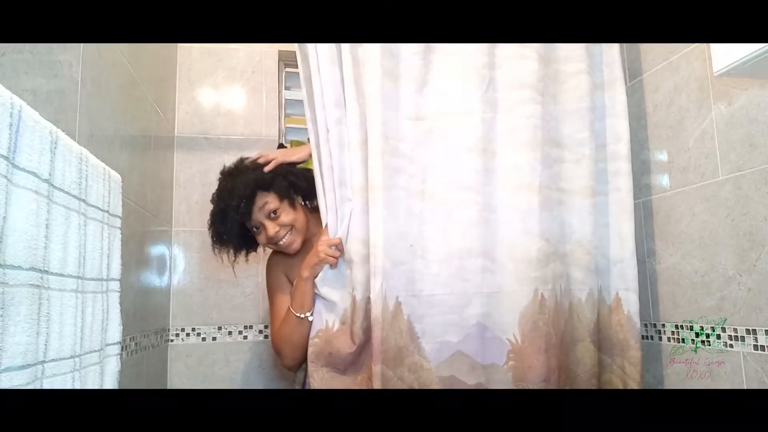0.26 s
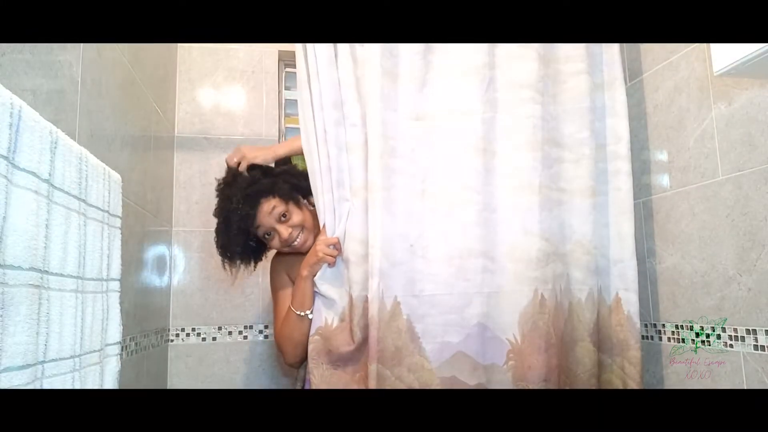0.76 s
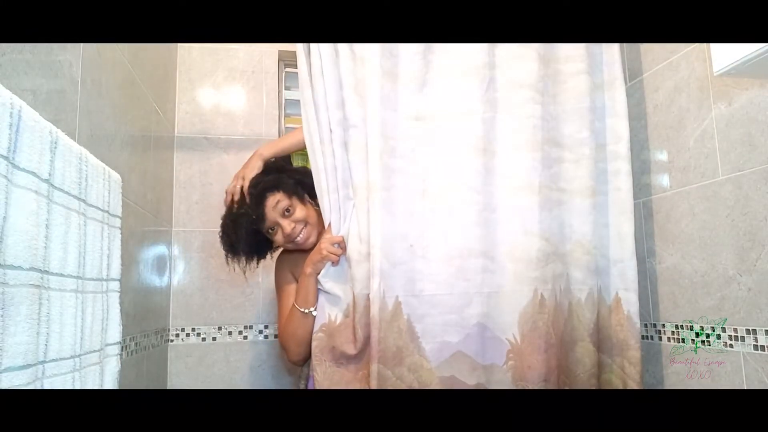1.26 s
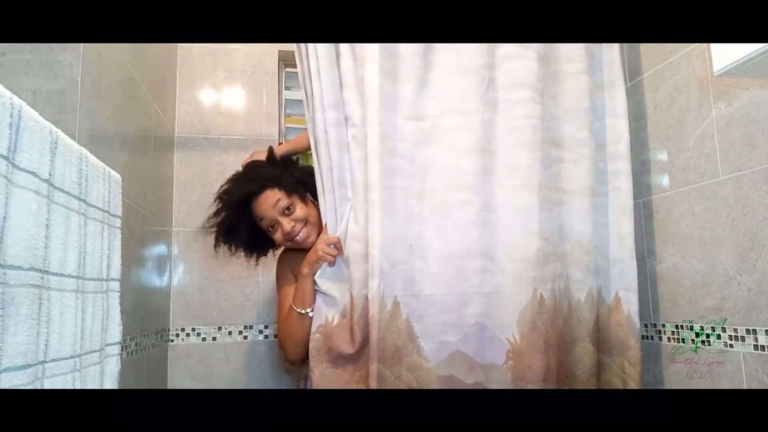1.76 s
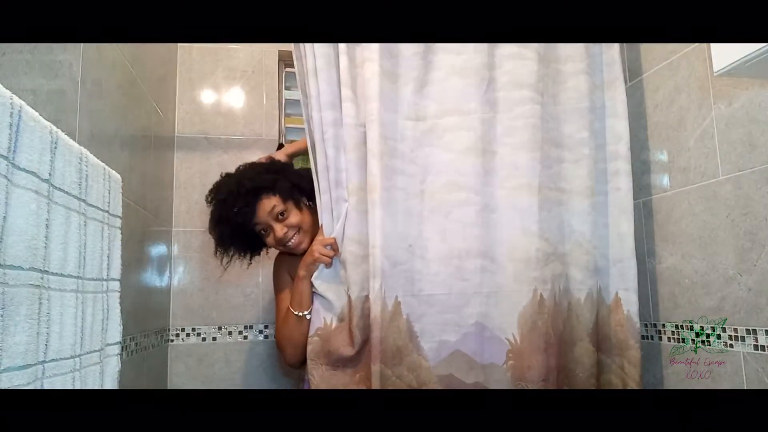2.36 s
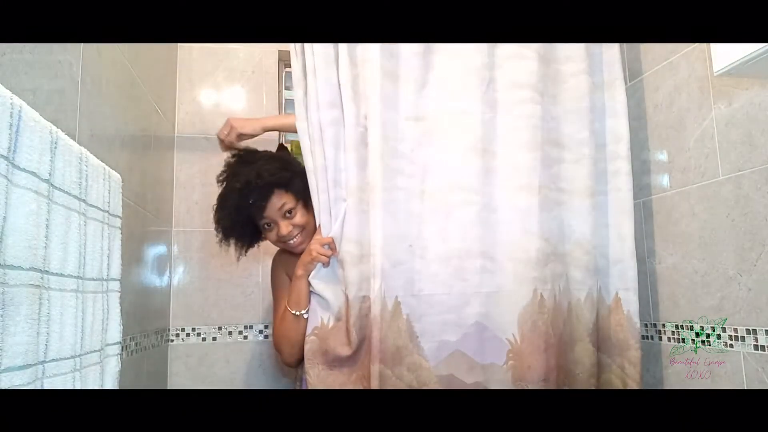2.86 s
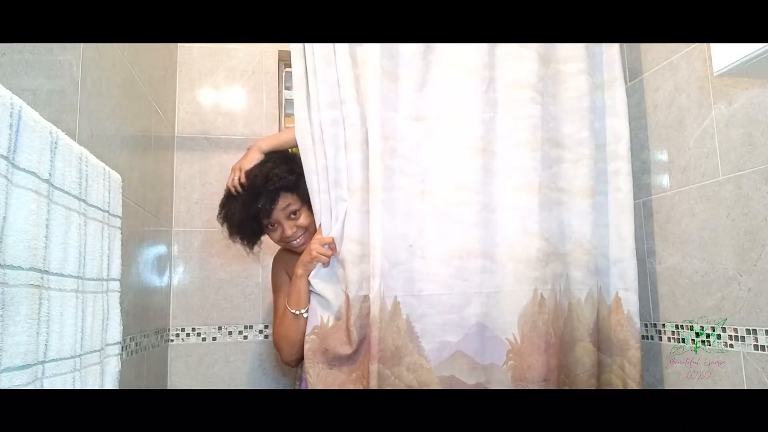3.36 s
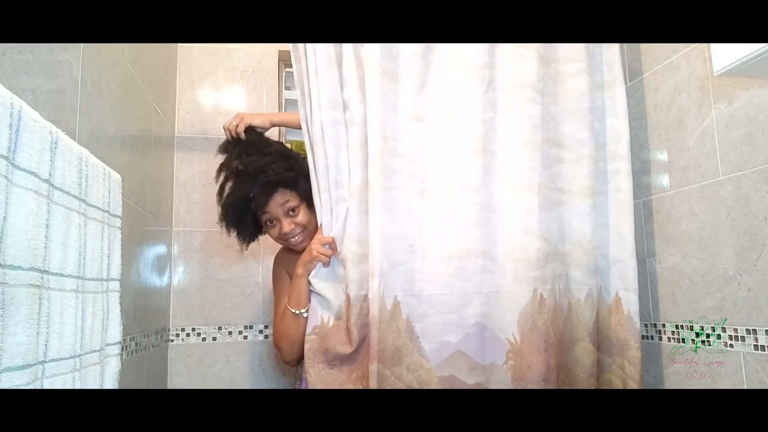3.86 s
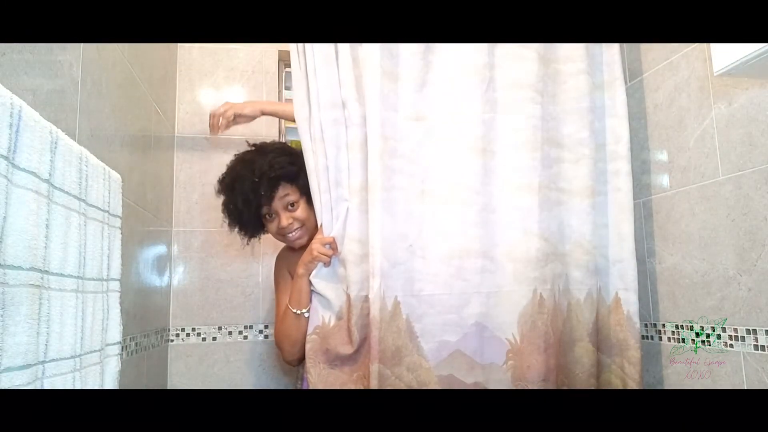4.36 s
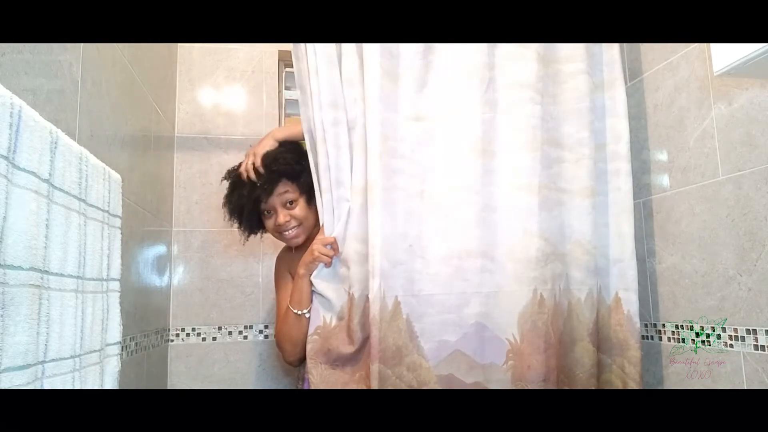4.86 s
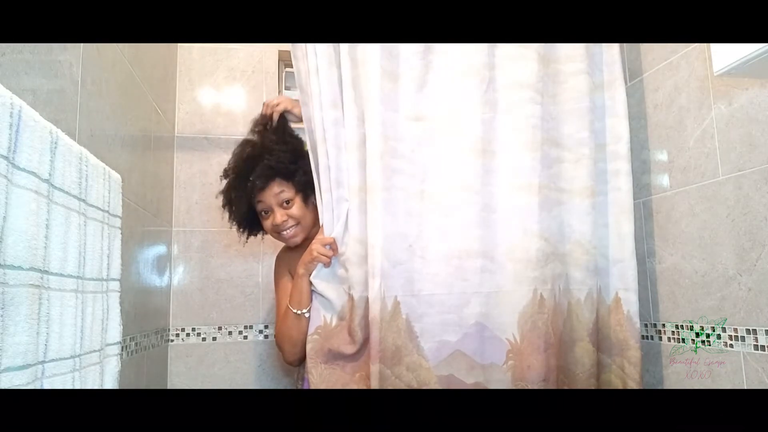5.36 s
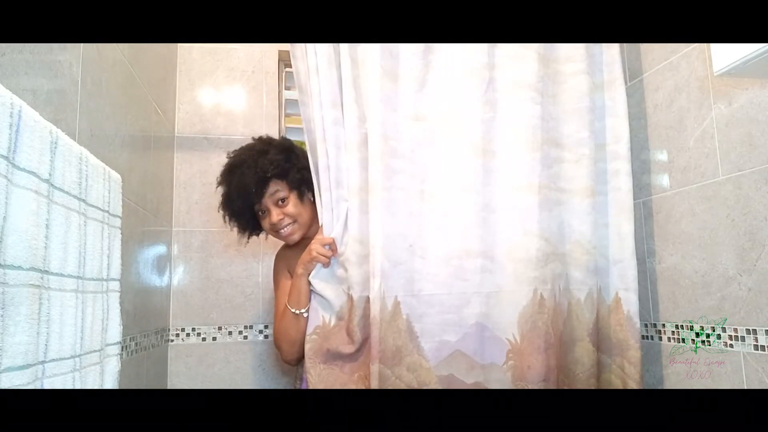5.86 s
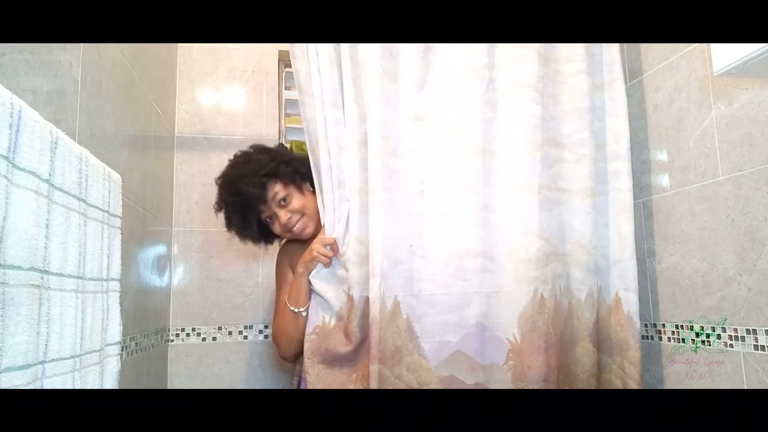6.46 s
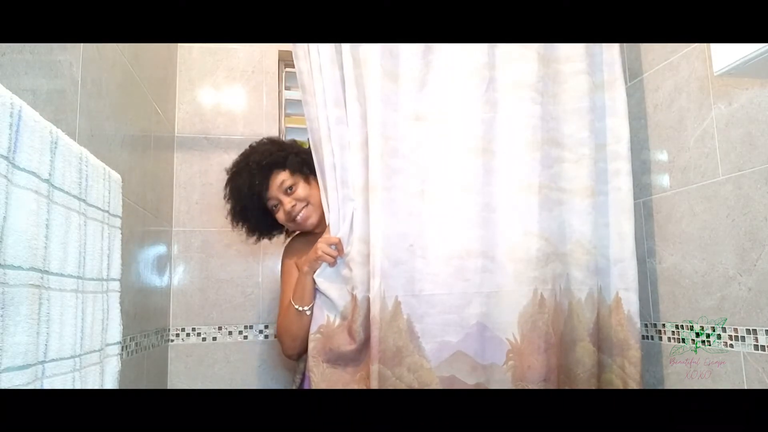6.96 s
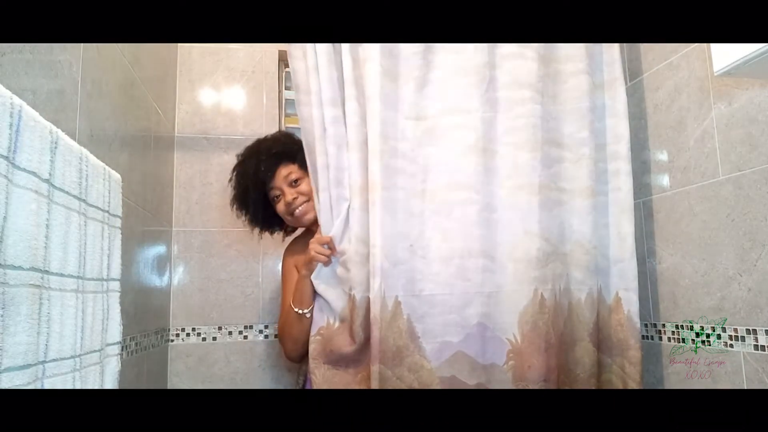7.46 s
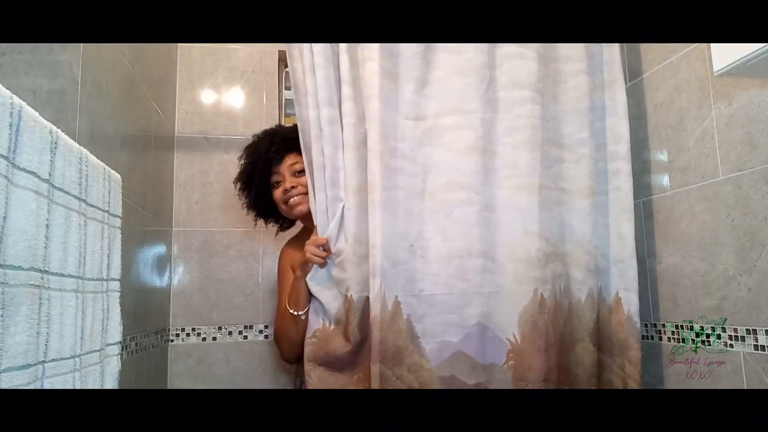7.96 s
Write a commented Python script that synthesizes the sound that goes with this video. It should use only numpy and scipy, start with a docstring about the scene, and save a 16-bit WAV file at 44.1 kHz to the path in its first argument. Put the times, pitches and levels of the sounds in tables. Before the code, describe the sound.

Steady shower water falls behind a cloth curtain into a tub, a fizzy patter with uneven spatters as the falling water shifts. Heavier slaps of water stand out midway and cluster toward the end, around a muffled knock on the tub. Faint low hum and hollow drumming lie underneath. The tiled room gives a short, tight reflection; the stereo pickup is fairly near and bright. No talking.

```python
"""Tiled bathroom: a shower sprays into a tub behind a curtain, heard by a two-port microphone.
Spray and splashes are one patter of noise and bubbles, its power shaped by frequency and time.
A few large bubbles plop. The tub drums as noise through its modes; soft blows ring the modes and slosh.
A low hum of a wandering sine and narrow rumble lies beneath."""
import sys
import numpy as np
from scipy import signal
from scipy.fft import rfft, irfft, next_fast_len
from scipy.io import wavfile
from scipy.ndimage import uniform_filter1d, map_coordinates

SR = 44100
rng = np.random.default_rng(int(sys.argv[2]) if len(sys.argv) > 2 else 0)


def inscribe(sig):
    """Save sig as 16-bit PCM at rate SR to the path in sys.argv[1].

    A 1-D sig is mono; a 2-D sig holds one channel per row.
    Samples are clipped to [-1, 1] before scaling.
    """
    pcm = np.round(np.clip(np.atleast_2d(sig).T, -1, 1) * 32767)
    wavfile.write(sys.argv[1], SR, pcm.astype(np.int16))


N = 362766

# Splashes that stand out; nominal peak over the spray: start_s, peak_db, bubble_radius_mm, spread_octaves, rise_ms
SPLASHES = [(0.054, 12.5, 0.85, 0.84, 10), (0.185, 11, 0.87, 0.85, 36), (0.282, 3, 0.35, 0.67, 12),
            (0.474, 9.5, 0.53, 0.42, 3.6), (0.585, 4.5, 0.74, 0.71, 26), (0.66, 6.5, 0.71, 0.97, 46),
            (0.774, 8.5, 0.62, 0.71, 9.4), (0.862, 7, 0.51, 1.2, 33), (0.965, 7.5, 0.48, 0.42, 5.3),
            (1.038, 6, 0.17, 1.5, 41), (1.1, 7.5, 0.59, 1, 47), (1.224, -4, 0.24, 1.56, 40),
            (1.296, 6.5, 0.7, 1.1, 16), (1.36, 4, 0.66, 1.4, 14), (1.412, 5, 1.2, 1, 31),
            (1.52, 3, 0.8, 1.5, 5.4), (1.584, 8, 0.25, 0.33, 4.8), (1.62, 10.5, 0.97, 0.35, 14),
            (1.706, 8.5, 0.57, 1.3, 10), (1.76, 9.5, 0.93, 1.14, 6.7), (1.846, 16.5, 0.87, 0.57, 13),
            (1.892, 5, 0.61, 0.95, 65), (1.923, 14, 0.78, 0.38, 4.6), (2.046, 6.5, 0.64, 0.95, 29),
            (2.14, -0.5, 0.65, 1.97, 13), (2.249, 8.5, 0.85, 0.76, 8.5), (2.364, 13, 0.92, 0.55, 7.7),
            (2.612, 12, 0.75, 0.72, 16), (2.759, 6, 0.59, 0.73, 21), (2.819, 2.5, 0.44, 0.83, 28),
            (2.886, 6.5, 0.61, 1.1, 18), (2.951, 9, 0.62, 0.78, 15.6), (2.976, 18.5, 1.31, 0.6, 9.4),
            (3.027, 9.5, 0.58, 0.78, 10), (3.279, 7.5, 0.39, 0.46, 7), (3.325, 9, 0.6, 0.81, 11),
            (3.48, 5, 0.61, 0.84, 13), (3.591, 7, 0.89, 0.7, 44), (3.666, 4, 0.52, 0.67, 14),
            (3.772, 1.5, 0.32, 0.97, 22), (3.89, 9.5, 1.04, 0.81, 9), (3.997, 10.5, 0.78, 0.72, 39),
            (4.231, 14, 0.8, 0.6, 18), (4.309, 24, 1.26, 0.35, 9), (4.312, 11.5, 0.54, 0.13, 6.7),
            (4.465, 17.5, 0.9, 0.48, 7.9), (4.515, 4, 0.21, 1.7, 21), (4.648, 5, 0.21, 0.38, 9.9),
            (4.715, 3.5, 0.32, 0.59, 15), (4.828, 5.5, 0.56, 0.67, 5.6), (4.939, 6.5, 0.54, 1.3, 5.2),
            (4.983, 7, 1.22, 0.41, 47), (5.073, 8.5, 0.64, 0.49, 8.7), (5.142, 4, 0.53, 1, 46),
            (5.212, 16.5, 0.94, 0.27, 6.8), (5.275, 5.5, 1.04, 0.86, 49), (5.332, 7.5, 0.45, 0.28, 28),
            (5.459, 4.5, 0.23, 1.1, 11), (5.481, 12, 0.85, 0.61, 17), (5.626, 8.5, 0.36, 0.95, 15),
            (5.759, 9.5, 1.06, 0.72, 12), (5.807, 6, 0.96, 1.1, 48), (5.894, 4.5, 0.48, 0.7, 32),
            (5.952, 3.5, 0.52, 1.26, 24), (6.058, 10.5, 0.93, 0.53, 14), (6.095, 4, 0.4, 0.79, 14),
            (6.172, 4.5, 0.81, 0.82, 34), (6.252, 16.5, 1.03, 0.32, 10), (6.3, 12, 0.82, 0.62, 5.1),
            (6.347, -1, 0.5, 1.5, 27), (6.45, 4.5, 0.59, 0.44, 7.2), (6.522, 2.5, 0.45, 1.17, 5.9),
            (6.563, 3.5, 0.64, 1, 15), (6.617, 4, 0.34, 1.7, 31), (6.713, 15, 0.92, 0.4, 10),
            (6.8, 3, 0.3, 0.33, 10), (6.853, 15, 0.78, 0.47, 13), (6.915, 19.5, 1.08, 0.41, 10),
            (7.023, 9, 0.8, 0.88, 25), (7.066, 9, 1.4, 0.41, 58), (7.125, 5.5, 0.3, 0.58, 18),
            (7.175, 10, 0.42, 0.29, 10), (7.279, 8, 0.16, 0.5, 18), (7.309, 18.5, 1.13, 0.4, 11),
            (7.35, 4, 0.37, 0.71, 25), (7.452, 2.5, 0.32, 0.74, 7.1), (7.524, 5, 0.38, 0.79, 27),
            (7.61, 3, 0.26, 0.36, 15), (7.677, 7.5, 0.64, 0.66, 16), (7.773, 16, 0.88, 0.73, 3),
            (7.805, 1, 0.51, 0.98, 18), (7.981, 17, 0.85, 0.62, 4), (8.02, 17.5, 0.89, 0.66, 15),
            (8.183, 4, 0.67, 0.73, 13)]
# Spray strength before room and clumps: time_s, level_db
SPRAY_FLOW = [(0.0, -36.5), (1.28, -35.5), (2.7, -36.5), (3.27, -36.5), (3.48, -34.5), (4.95, -37),
              (5.27, -33), (5.52, -38), (5.75, -35.5), (7.1, -35), (8.23, -37.5)]
# Spray colour at the microphone, relative: freq_hz, density_db_per_hz
SPRAY_COLOUR = [(530, -31), (900, -22.5), (1130, -23.5), (1500, -19.5), (1940, -18), (3070, -13.5),
                (3500, -10), (4800, -6), (6900, 1.5), (7300, -4.5), (8200, -7), (11500, 0), (13500, 0),
                (14600, -1), (15900, -7.5)]
# Coarse drops of the spray, used relative to their mean: time_s, level_db
COARSE_DROPS = [(0.0, -52.5), (0.11, -62), (0.32, -61.5), (0.57, -63), (0.82, -57), (1.56, -59),
                (1.76, -58.5), (2.47, -60), (3.64, -59.5), (4.12, -62), (4.47, -55), (4.63, -58),
                (4.97, -58), (5.18, -59), (5.5, -58.5), (6.14, -58.5), (6.69, -58.5), (6.99, -54),
                (7.42, -60), (8.23, -55.5)]
# RMS depth of the clumps in the patter: freq_hz, depth_db
CLUMP_DEPTH = [(1000, 2.5), (3000, 2.5), (7000, 1.3), (14000, 1.64)]
# Single large bubbles, before the room: start_s, peak_db, pitch_hz, life_ms
PLOPS = [(1.66, -55, 1390, 7.9), (1.695, -54, 1450, 6.6), (5.013, -48, 2430, 4.7), (5.714, -63, 1540, 7),
         (7.074, -46, 2060, 9.2), (7.148, -60, 1604, 12)]
# Dull wash in the tub, relative: freq_hz, density_db_per_hz
TUB_WASH = [(15, -42), (25, -22), (60, -3.5), (110, -4.5), (197, -10.5), (270, -6), (422, -11), (608, -6.5),
            (1070, -25.5), (1500, -6), (2860, -120)]
# Tub modes, relative: freq_hz, level_db, t60_s
TUB_MODES = [(143, -1, 0.15), (277, 3.5, 0.24), (341, 5, 0.11), (399, -4.5, 0.26), (486, 2, 0.49),
             (644, 0.5, 0.53), (730, -4.5, 0.49), (843, 4.5, 0.24), (990, -5, 0.2), (1280, -7, 0.15)]
# Drumming of the tub before its sway: time_s, level_db
TUB_LEVEL = [(0.0, -68), (1.88, -65.5), (5.61, -66.5), (6.99, -64), (7.4, -67.5), (7.63, -63),
             (8.23, -65.5)]
# Blows on the tub, nominal level before the room: start_s, peak_db, centre_hz, rise_ms, slosh_db (re blow)
THUMPS = [(.66, -62, 700, 16, 0), (1.261, -55.5, 366, 17, -4), (1.799, -55, 325, 44, -2),
          (3.721, -58.5, 355, 17, -4), (4.01, -60, 570, 20, -5), (4.681, -58, 648, 9.8, -3.5),
          (5.756, -55.5, 649, 13, -3), (6.629, -50, 760, 10.4, -8), (6.648, -54, 600, 12, -8),
          (6.758, -39, 562, 18.4, -15), (6.805, -54, 780, 8.9, -9), (6.834, -58, 560, 8.6, -8),
          (6.956, -58, 400, 18, -8), (7.02, -58, 380, 16, -11), (7.099, -58, 530, 17, -5),
          (7.181, -55, 330, 18, -5)]
# Hum, base level before flutter: time_s, level_db, pitch_hz
HUM = [(0.0, -68, 84.6), (0.23, -79, 79), (0.75, -64, 82.8), (1.19, -74, 88.1), (1.33, -72, 73.8),
       (1.56, -68, 91.4), (1.63, -65, 83), (2.45, -77, 73.2), (2.56, -73, 78.1), (3.12, -74, 87.5),
       (3.41, -71, 80.4), (3.57, -73, 88.3), (4.28, -73.5, 83.0), (4.44, -78, 92.6), (4.58, -68, 76.9),
       (5.91, -68, 79), (6.02, -67, 84.5), (6.19, -70, 73), (6.3, -69, 88.4), (6.57, -69, 77.1),
       (6.71, -73, 90.0), (7.26, -76, 80), (7.49, -70, 82.8), (7.7, -75.5, 71.6), (8.02, -70, 84.9),
       (8.23, -76, 73.9)]
# Left-right likeness: freq_hz, correlation
PORT_LIKENESS = [(60, 0.17), (150, 0.59), (380, 0.83), (950, -0.14), (2380, -0.017), (5980, -0.0021),
                 (15000, 0.086)]
# Level offset between ports: freq_hz, left_minus_right_db
PORT_LEAN = [(60, 1.5), (180, 2), (550, -5.5), (1650, -1), (4970, 0.0), (15000, -1)]

TOP_HZ = 15890
FRAME = 256  # samples
COARSE_HZ = 3000  # coarse drops ring mostly below
PELT_DB = 1.6  # RMS unevenness of a splash's drops
SPLASH_FADE_MS = 26.2  # power of the main part falls by 63%
BRIGHT_DB, BRIGHT_FADE_MS, BRIGHT_EDGE_HZ = -12.5, 22, 3720  # weaker, brighter part of a splash
DRIBBLES_PER_S, DRIBBLE_DB, DRIBBLE_RISE_MS = 4, -9, 41  # level over the spray
DRIBBLE_RADIUS_MM, DRIBBLE_SCATTER_OCTAVES = 0.27, 1.46  # middle, scatter to either side
DRIBBLE_SPREAD_OCTAVES = 0.13
TUB_SWAY_DB = 0.7
RING_DB = -20  # mode ring re blow
SLOSH_T60_S, SLOSH_WIDTH_OCTAVES = 0.49, 0.37


def shower():
    """Drops strike as one patter; splashes add power to the spray by frequency and time."""
    frames = dict(fs=SR, nperseg=FRAME, noverlap=FRAME * 3 // 4)
    patter = droplets(count=10000, cycles=3.5, scatter_db=3.5, bubble_db=-12.5)
    hz, t, spectrum = signal.stft(patter, **frames)

    coarse_db = np.interp(t, *np.transpose(COARSE_DROPS))
    coarse_share = 1 / (1 + (hz / COARSE_HZ) ** 2)
    spray_power = amp(2 * np.outer(coarse_share, coarse_db - coarse_db.mean()))

    pelt = amp(2 * PELT_DB * unit(uniform_filter1d(rng.standard_normal(len(t)), size=3)))
    pelt = pelt / pelt.mean()

    # clumps: patches of random gain
    field = rng.standard_normal(spray_power.shape)
    field = uniform_filter1d(field, size=6, axis=0)
    field = uniform_filter1d(field, size=16, axis=1)
    clumps = amp(2 * along(CLUMP_DEPTH, hz)[:, None] * unit(field))

    power = (spray_power + pelt * splash_power(hz, t)) * clumps
    water = signal.istft(spectrum * np.sqrt(power), **frames)[1][:, :N]
    room = tiles(stereo(water), t60_s=0.06, wet_db=-5, dull_hz=5000)

    def colour(f):
        gain = amp(along(SPRAY_COLOUR, f))
        return gain / np.sqrt(np.mean(gain ** 2))

    return amp(curves(SPRAY_FLOW)[0]) * filtered(room, colour)


def splash_power(hz, t):
    """Power rises smoothly and fades around the bubbles' pitch; a weaker, brighter part fades a little sooner."""
    rows = np.vstack([SPLASHES, dribbles()])
    start_s, peak_db, radius_mm, spread_octaves, rise_ms = np.transpose(rows)[:, :, None]
    since_ms = 1000 * (t - start_s)
    swell = amp(2 * peak_db) * np.sin(np.pi / 2 * np.clip(since_ms / rise_ms, 0, 1)) ** 2
    after_ms = np.maximum(since_ms - rise_ms, 0)
    pitch_hz = 3260 / radius_mm  # bubble resonance
    sizes = np.exp(-.5 * (np.log2((hz + 1) / pitch_hz) / spread_octaves) ** 2)
    treble = amp(2 * BRIGHT_DB) * hz ** 2 / (hz ** 2 + BRIGHT_EDGE_HZ ** 2)
    main = sizes.T @ (swell * np.exp(-after_ms / SPLASH_FADE_MS))
    bright = (sizes * treble).T @ (swell * np.exp(-after_ms / BRIGHT_FADE_MS))
    return main + bright


def dribbles():
    """Small splashes at chance times, as rows like those of SPLASHES."""
    when, size = rng.random((int(DRIBBLES_PER_S * N / SR), 2)).T
    same = np.ones_like(when)
    radius_mm = DRIBBLE_RADIUS_MM * 2 ** (DRIBBLE_SCATTER_OCTAVES * (2 * size - 1))
    return np.transpose([when * N / SR, DRIBBLE_DB * same, radius_mm,
                         DRIBBLE_SPREAD_OCTAVES * same, DRIBBLE_RISE_MS * same])


def droplets(count, cycles, scatter_db, bubble_db):
    """Near-white patter: noise for the blur of far drops plus single bubbles of uneven size."""
    when, pitch, port = rng.random((3, count, 1))
    hz = 900 + 15000 * pitch
    # high bubbles are short, so larger for a white sum
    size = np.sqrt(hz) * amp(scatter_db * rng.standard_normal((count, 1)))
    k = np.arange(2 * FRAME)
    at = (when * N).astype(int) + k + (port > .5) * 2 * N  # ports laid end to end
    rings = size * bubble(hz, cycles / hz, k / SR)
    fizz = np.bincount(at.ravel(), rings.ravel(), 4 * N).reshape(2, -1)[:, :N]
    return rng.standard_normal((2, N)) + amp(bubble_db) * unit(fizz)


def bubble(hz, life_s, t):
    """A bubble starts softly, rises in pitch and dies away."""
    u = t / life_s
    return np.e * u * np.exp(-u) * np.sin(2 * np.pi * hz * t * (1 + 0.0099 * u))


def plops():
    """Large bubbles ring out of the patter, each port at its own small lag."""
    out, t = np.zeros((2, N + SR)), np.arange(SR // 10) / SR
    for start_s, peak_db, pitch_hz, life_ms in PLOPS:
        for port in out:
            start = round(start_s * SR) + rng.integers(0, 5)
            port[start:start + len(t)] += amp(peak_db) * bubble(pitch_hz, life_ms / 1000, t)
    return out[:, :N]


def tub():
    """Falling water keeps the tub's modes drumming over a dull wash."""
    def ring(f):
        return sum(amp(db) * 1j * f * (3.6 / t60) / (c * c - f * f + 1j * f * 2.2 / t60)
                   for c, db, t60 in TUB_MODES)

    noise = stereo(rng.standard_normal((2, N)))
    drum = filtered(noise, lambda f: amp(along(TUB_WASH, f)) * (1 + amp(-4.5) * ring(f)))
    return amp(curves(TUB_LEVEL)[0] + TUB_SWAY_DB * wobble(4.7)[0]) * unit(drum)


def thumps():
    """Blows swell on the nearest tub modes, which ring weakly; a muffled wash swells along and dies slowly."""
    out, t = np.zeros((2, N + SR)), np.arange(SR // 2) / SR
    mode_hz, mode_db, t60_s = np.transpose(TUB_MODES)[:, :, None, None]
    f = np.fft.rfftfreq(len(t), 1 / SR) + 1
    for start_s, peak_db, centre_hz, rise_ms, slosh_db in THUMPS:
        u = 1000 * t / rise_ms
        onset = np.minimum(u, 1)
        swell = (u * np.exp(1 - u)) ** 5 + amp(RING_DB - 60 * t / t60_s) * onset
        share = amp(mode_db - 29 * np.log2(mode_hz / centre_hz) ** 2)
        # ports differ a little in phase (turns)
        turn = rng.random(mode_hz.shape) + rng.normal(0, .07, (len(TUB_MODES), 2, 1))
        modes = share * swell * np.sin(2 * np.pi * (mode_hz * t + turn))
        blow = np.sum(modes, axis=0) / np.linalg.norm(share)

        band = np.exp(-.5 * (np.log2(f / centre_hz) / SLOSH_WIDTH_OCTAVES) ** 2)
        slosh = unit(irfft(rfft(rng.standard_normal(len(t))) * band, len(t)))
        blow = blow + amp(slosh_db - 60 * t / SLOSH_T60_S) * onset ** 2 * slosh
        start = round(start_s * SR)
        out[:, start:start + len(t)] += amp(peak_db) * blow
    return out[:, :N]


def hum():
    """A low sine wanders in pitch and flutters in level, blurred by rumble around 81 Hz."""
    level_db, pitch_hz = curves(HUM)
    phase = 2 * np.pi * np.cumsum(pitch_hz) / SR
    phase = phase + 0.98 * wobble(12)[0] + 0.6 * wobble(4.6)  # radians
    noise = stereo(rng.standard_normal((2, N)))
    rumble = filtered(noise, lambda f: np.exp(-.5 * ((f - 81) / 8.9) ** 2))
    tone = amp(2.5 + 3.8 * wobble(12)) * np.sin(phase)
    return amp(level_db) * (tone + amp(-4.5) * unit(rumble))


def tiles(x, t60_s, wet_db, dull_hz):
    """Tiled walls answer with a dense tail, another at each port; cloth soaks up its treble."""
    t = np.arange(SR // 2) / SR
    tail = rng.standard_normal((2, len(t))) * amp(-60 * t / t60_s) * (t > .003)
    tail = amp(wet_db) * tail / np.linalg.norm(tail, axis=1, keepdims=True)
    wet = signal.fftconvolve(x, tail, axes=1)[:, :N]
    return x + filtered(wet, lambda f: 1 / (1 + 1j * f / dull_hz))


def stereo(pair):
    """Two unrelated signals mixed into left and right, with likeness set by frequency."""
    def mix(f):
        turn = np.arccos(np.clip(along(PORT_LIKENESS, f), -1, 1)) / 2
        return np.array([np.cos(turn), np.sin(turn)])

    mid, side = filtered(pair, mix)
    return np.array([mid + side, mid - side])


def wobble(knots_per_s):
    """Two smooth random curves: spline through random knots."""
    knots = rng.standard_normal((2, int(N * knots_per_s / SR) + 4))
    at = np.arange(N) * knots_per_s / SR
    return np.array([map_coordinates(row, [at]) for row in knots])


def amp(db):
    """Decibels to amplitude."""
    return 10 ** (np.asarray(db) / 20)


def unit(x):
    """Scale to an RMS of one."""
    return x / np.sqrt(np.mean(x ** 2) + 1e-20)


def along(points, hz):
    """Interpolate (freq_hz, value) points on a log frequency axis."""
    f, v = np.transpose(points)
    return np.interp(np.log(hz + 1), np.log(f + 1), v)


def curves(rows):
    """One value per sample for each column after the time."""
    time_s, *columns = np.transpose(rows)
    return [np.interp(np.arange(N) / SR, time_s, c) for c in columns]


def filtered(x, response):
    """Multiply the spectrum of x by a response of frequency in Hz."""
    m = next_fast_len(N + SR // 2)
    return irfft(rfft(x, m) * response(np.fft.rfftfreq(m, 1 / SR)), m)[..., :N]


def scene():
    """Sum of all sources; the ports differ in level by frequency."""
    knocks = tiles(thumps() + plops(), t60_s=0.3, wet_db=-7, dull_hz=5000)
    room = shower() + knocks + tub() + hum()
    return filtered(room, lambda hz: amp(along(PORT_LEAN, hz) * [[.5], [-.5]]))


def record(dry):
    """The microphone's output holds nothing above its band limit."""
    return filtered(dry, lambda hz: hz < TOP_HZ)


dry = scene()
out = record(dry)
inscribe(out)
```